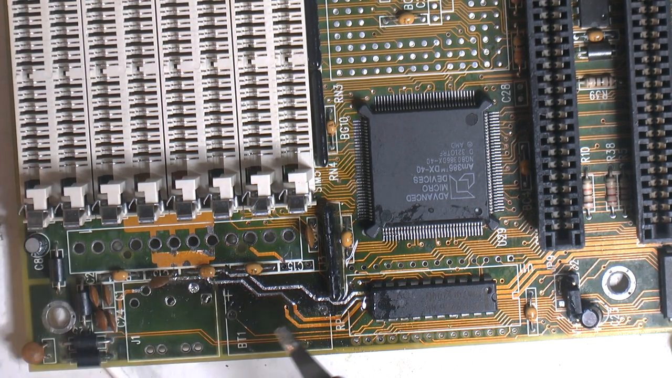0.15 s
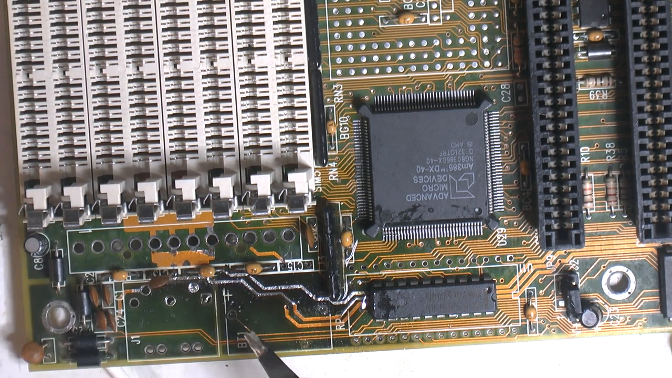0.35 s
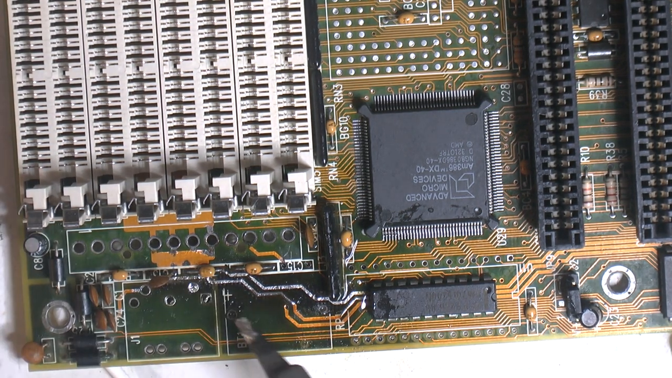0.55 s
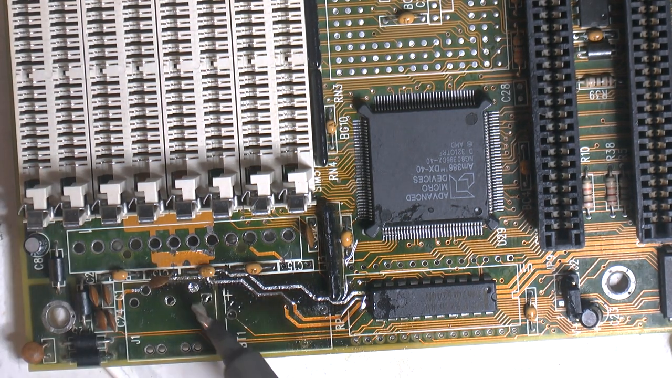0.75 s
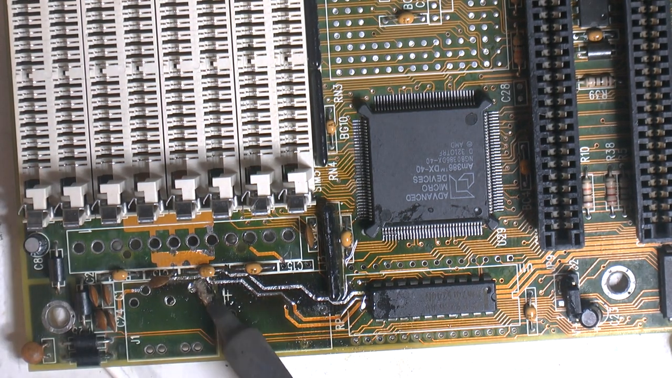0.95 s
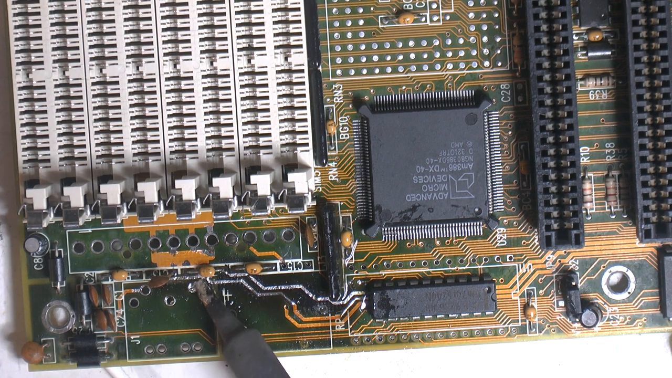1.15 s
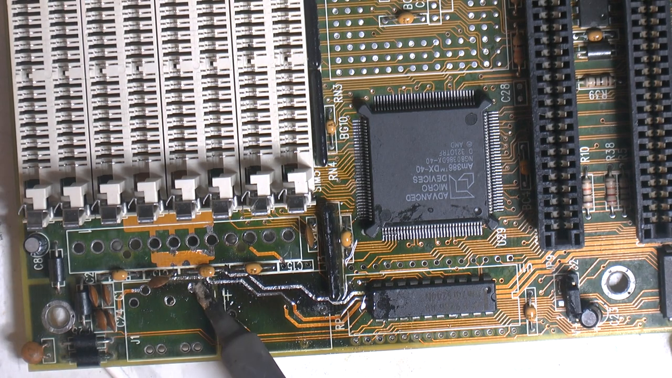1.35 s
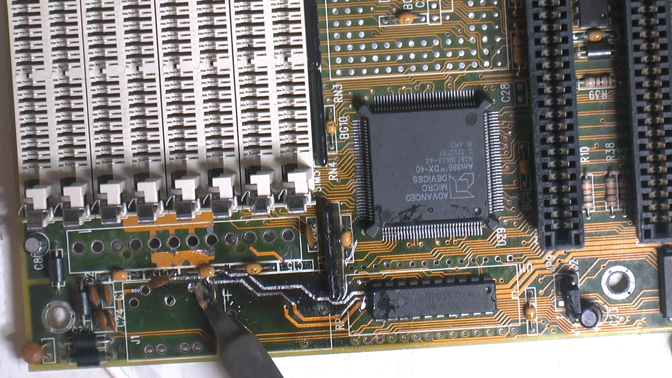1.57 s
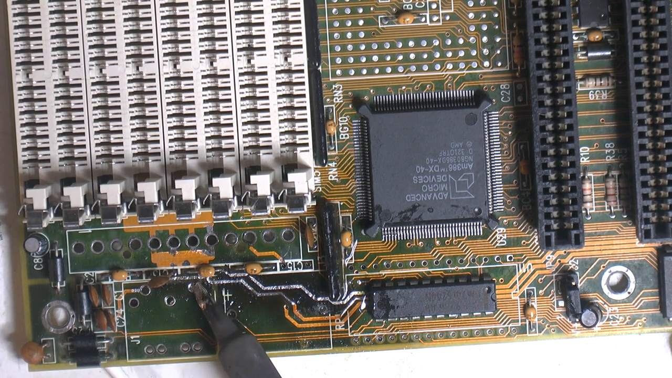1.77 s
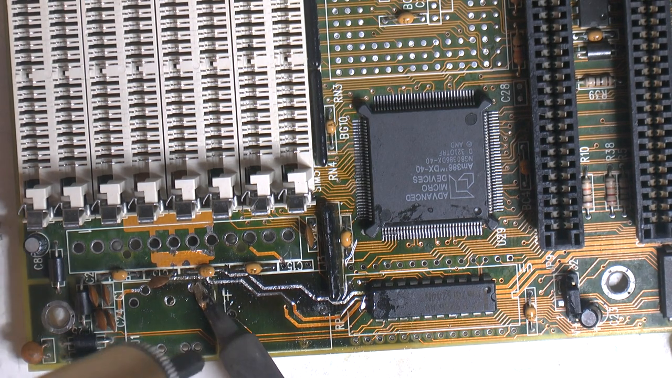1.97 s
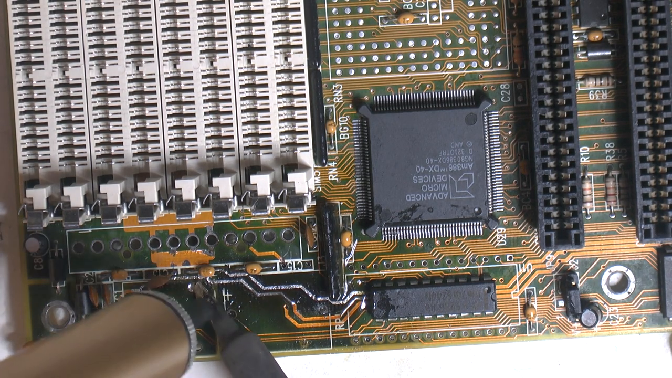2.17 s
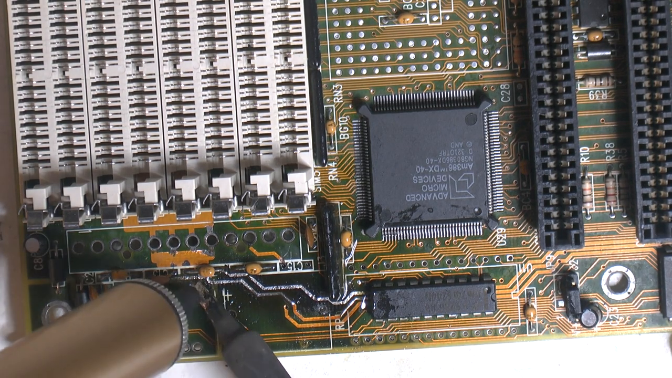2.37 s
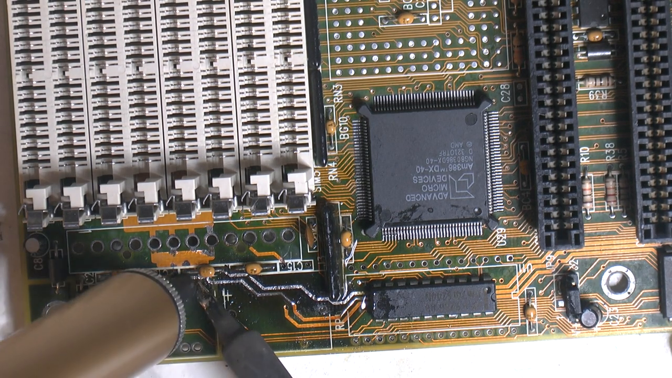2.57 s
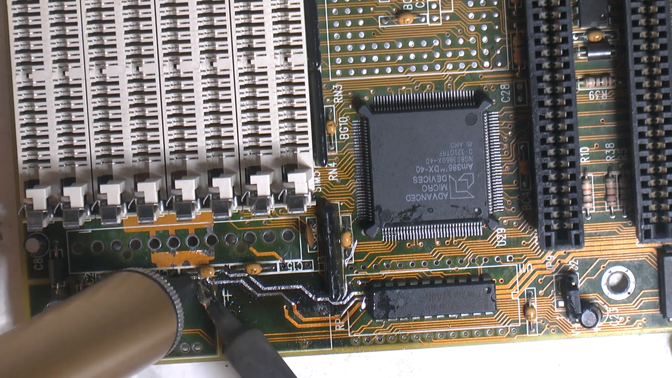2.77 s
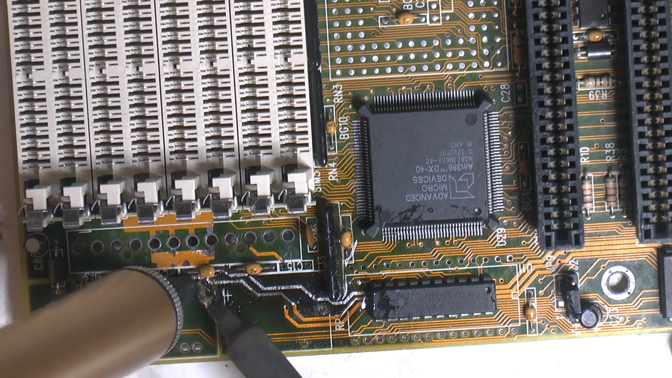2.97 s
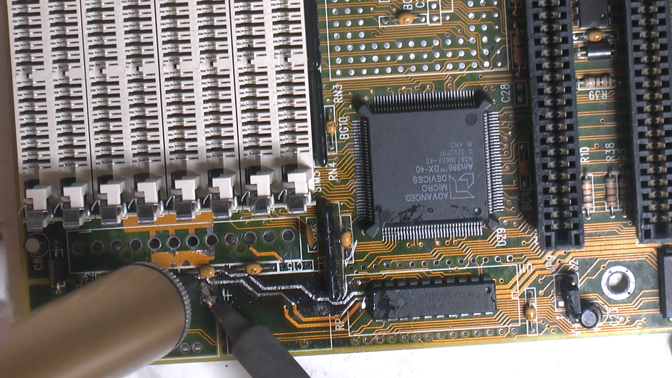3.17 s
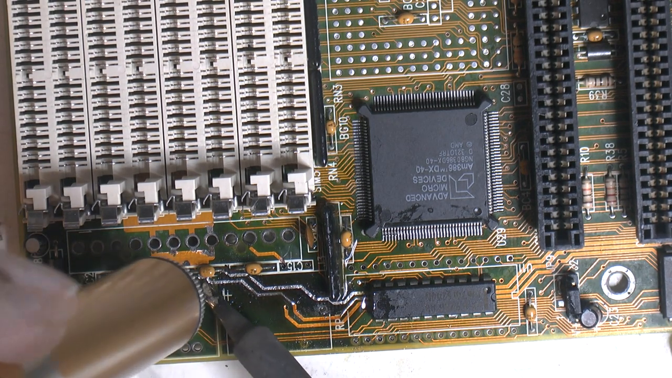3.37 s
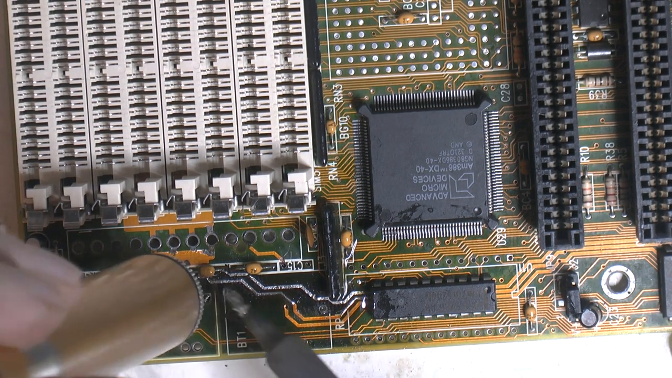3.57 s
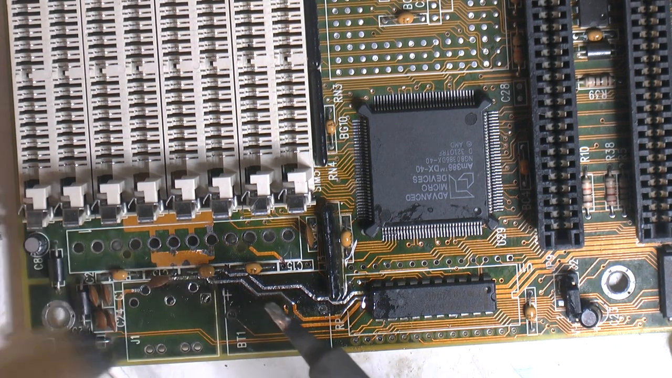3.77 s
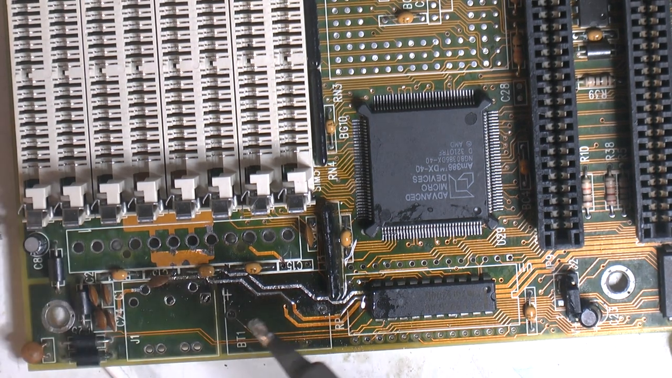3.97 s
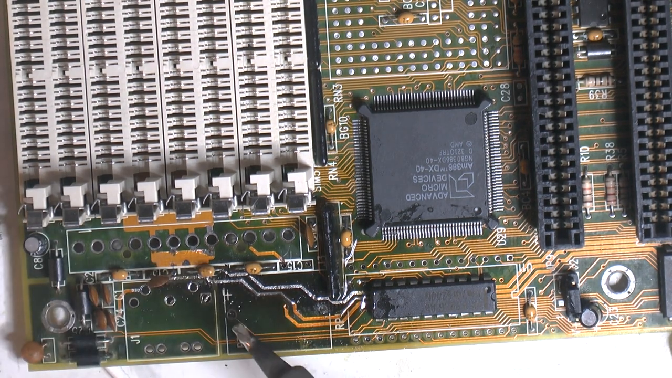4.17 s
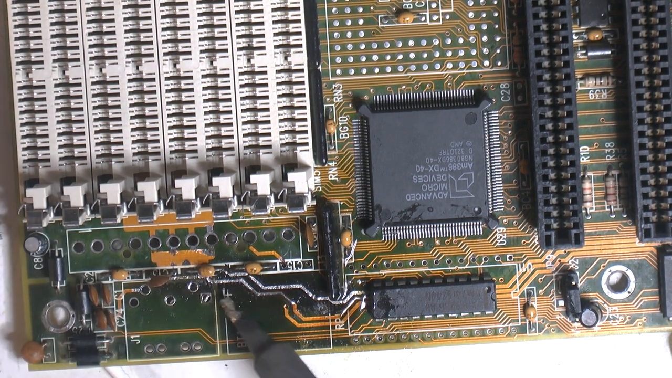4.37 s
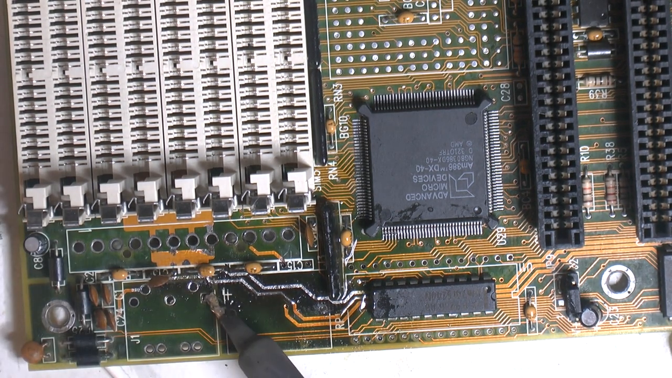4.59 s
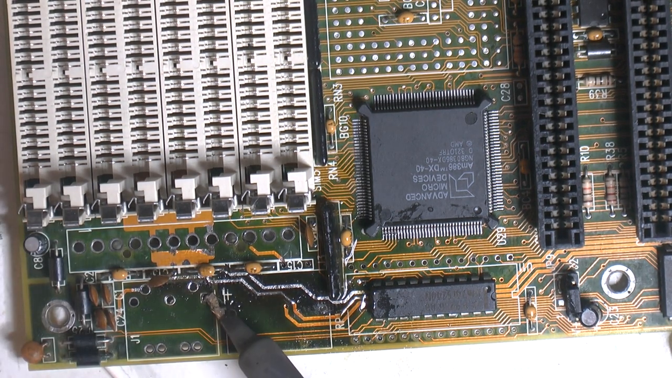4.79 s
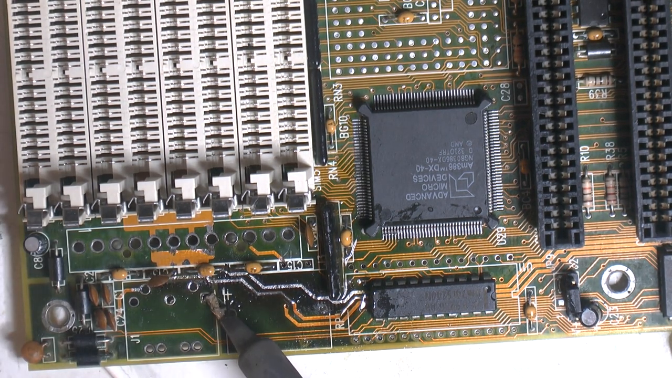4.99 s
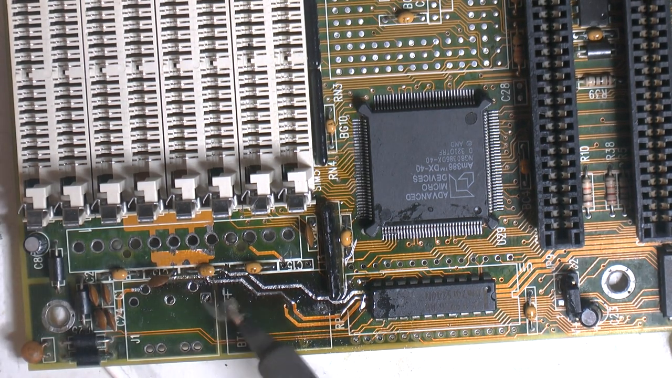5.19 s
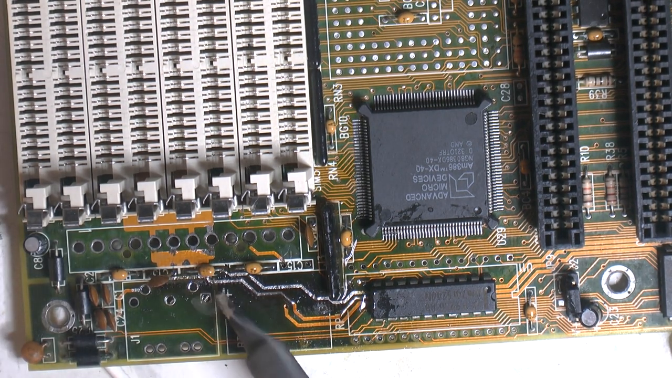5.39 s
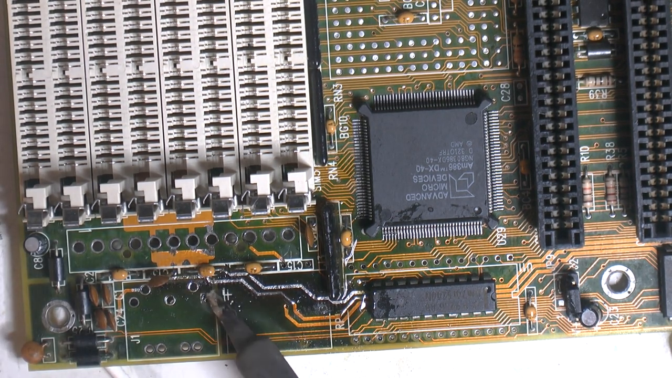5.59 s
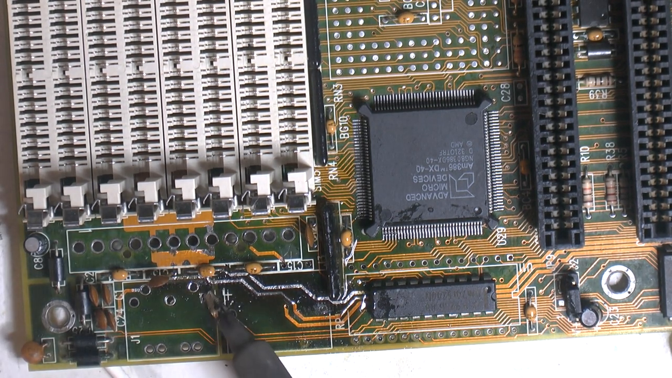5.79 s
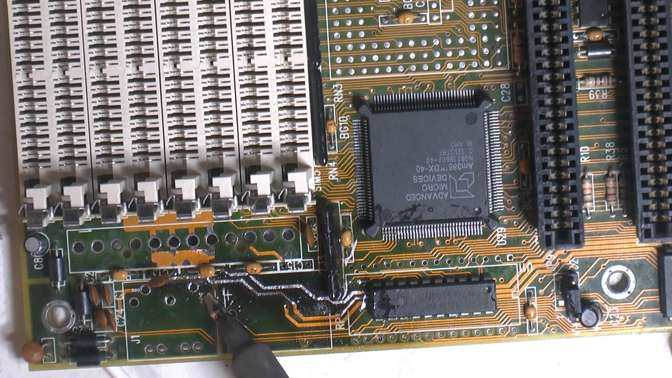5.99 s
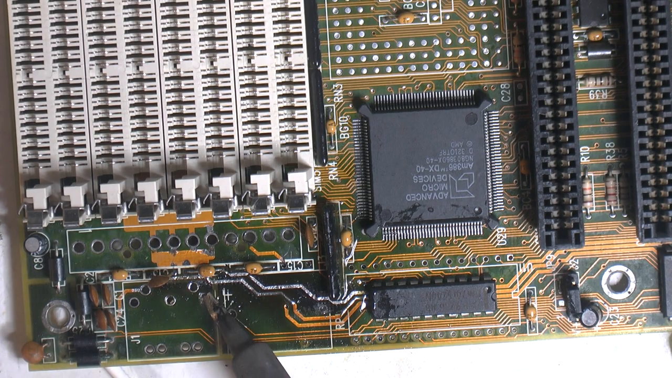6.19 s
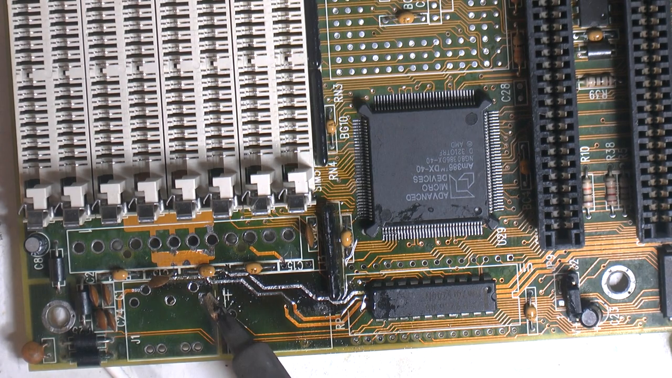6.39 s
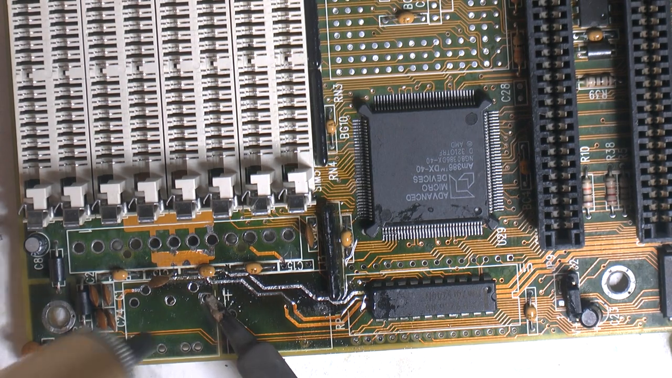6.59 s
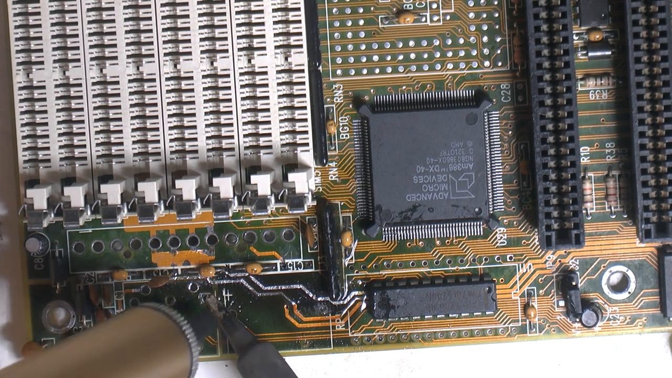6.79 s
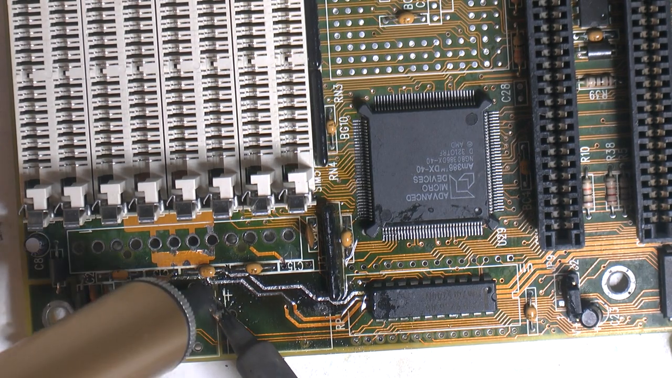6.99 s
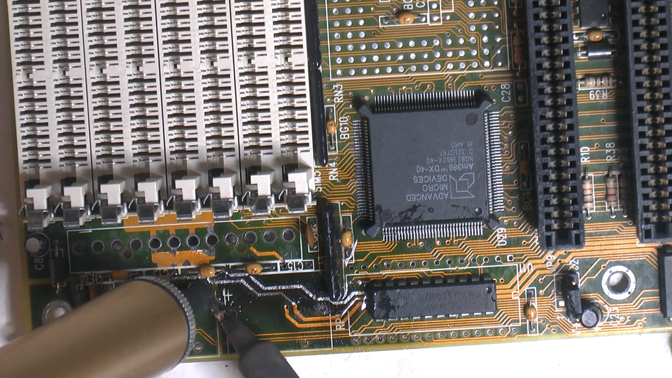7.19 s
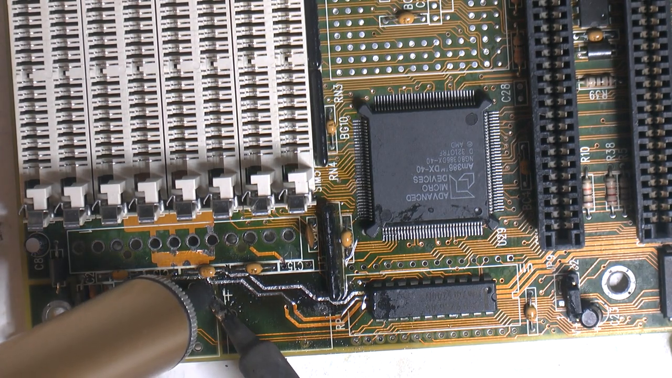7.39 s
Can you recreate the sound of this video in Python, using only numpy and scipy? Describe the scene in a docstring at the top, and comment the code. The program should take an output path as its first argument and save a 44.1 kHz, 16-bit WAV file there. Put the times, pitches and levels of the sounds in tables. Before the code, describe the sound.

A desoldering pump clicks as it is cocked, fires with one loud snap and thud, then is cocked again over a faint hum.

```python
"""A spring-loaded desoldering pump, worked close by over a circuit board on a bench. Its plunger slides in
with friction and latches; on release the piston flies back, drawing air, and its impact on the stop
overloads the input. Iron and pump bump the board and the bench, whose damped modes thud, ring and rock;
heavy jolts leave a low drone. A small room reverberates over a faint hum."""
import sys
import numpy as np
from scipy import signal
from scipy.fft import rfft, irfft
from scipy.io import wavfile
from scipy.ndimage import uniform_filter1d

SR = 44100
rng = np.random.default_rng(int(sys.argv[2]) if len(sys.argv) > 2 else 0)


def dump(signal):
    """Clip the signal to [-1, 1] and save it as 16-bit WAV at the path in sys.argv[1]."""
    limited = np.clip(np.atleast_2d(signal).T, -1, 1)
    pcm = np.round(limited * 32767).astype(np.int16)
    wavfile.write(sys.argv[1], SR, pcm)


N = 328545
TIME = np.arange(N) / SR
RING_TIME = TIME[:SR]
FREQS = np.maximum(np.arange(2049) * SR / 4096, 1)


def undb(db):
    """Amplitude ratio of a level in decibels."""
    return 10 ** (np.asarray(db) / 20)

def unit(x):
    """Normalisation to rms 1."""
    return x / np.sqrt(np.mean(x ** 2))

def strength(x):
    """Normalisation of a blow: its loudest two milliseconds peak near 1."""
    return x / (2 * np.sqrt(uniform_filter1d(x ** 2, size=88).max()))

def at_hz(points, hz):
    """Interpolation of (f, value) points on a logarithmic frequency axis."""
    f, value = np.transpose(points)
    return np.interp(np.log(hz), np.log(f), value)

def colour(x, db):
    """Minimum-phase filter with gain db at FREQS, from the folded cepstrum."""
    cepstrum = irfft(db * np.log(10) / 20)
    half = len(cepstrum) // 2
    cepstrum[1:half] *= 2
    cepstrum[half + 1:] = 0
    return signal.fftconvolve(x, irfft(np.exp(rfft(cepstrum))))[:len(x)]

def noise(spectrum):
    """Filtered Gaussian noise of rms 1."""
    return unit(colour(rng.standard_normal(N), at_hz(spectrum, FREQS)))

def walk(rate):
    """Smooth random modulation of rms 1, with `rate` new values a second."""
    step = max(int(SR / rate), 1)
    stairs = np.repeat(rng.standard_normal(N // step + 1), step)
    return unit(uniform_filter1d(stairs, step)[:N])

def tone(hz, waver_hz=1.0, waver_db=2.5):
    """Sinusoid of rms near 1, randomly modulated in frequency and amplitude."""
    phase = 2 * np.pi * np.cumsum(hz + waver_hz * walk(5.6)) / SR
    return np.sqrt(2) * np.sin(phase) * undb(waver_db * walk(5.7))

def fade(t60):
    """Exponential decay, 60 dB down after t60."""
    return np.exp(-np.log(1000) * RING_TIME / t60)

def burst(t60):
    """Decaying noise: a dying shower of micro-impacts."""
    return rng.standard_normal(SR) * fade(t60)

def held(start, end, attack_s, release_s):
    """Envelope with a quadratic rise from start and an exponential decay from end."""
    rise = np.clip((TIME - start) / attack_s, 0, 1) ** 2
    return rise * np.exp(-np.maximum(TIME - end, 0) / release_s)

def add(track, s, sound):
    """Superposition of a sound on the track at time s."""
    start = max(int(s * SR), 0)
    track[start:start + len(sound)] += sound[:N - start]


# lines of the workshop's hum: f/Hz, rms level/dB
HUM_LINES = [(59.2, -62.5), (100.3, -54), (192, -65.5), (340, -67), (901, -77.5), (1319, -83.5)]
# spectra of the rumble under the bench and of the even noise: f/Hz, level/dB
RUMBLE_SPECTRUM = [(12, -14.5), (26, -1.5), (45, -7), (62, -11.5), (80, -18.5), (100, -21), (200, -22),
                   (400, -39.5), (2000, -78.5)]
AIR_SPECTRUM = [(20, -2.5), (33, -7.5), (65, -16), (82, -19), (103, -2.5), (145, -17), (165, -22.5),
                (195, -12.5), (250, -24.5), (340, -20.5), (440, -27), (900, -32.5), (1600, -35.5),
                (2500, -39.5), (3000, -36), (3600, -42), (15500, -48.5)]

def workshop(rumble_db=-51, swell_db=4, air_db=-52):
    """Noise floor: a line spectrum of hum over continuous spectra of swelling rumble and even hiss."""
    hum = sum(undb(db) * tone(hz) for hz, db in HUM_LINES)
    rumble = undb(rumble_db + swell_db * walk(2.7)) * noise(RUMBLE_SPECTRUM)
    return hum + rumble + undb(air_db) * noise(AIR_SPECTRUM)


# frequency response of the room: f/Hz, level/dB
ROOM_RESPONSE = [(60, -16.5), (200, -21.5), (450, -13.5), (900, -4.5), (1400, -3), (1900, -7), (2700, -9),
                 (4000, -9), (7000, -8), (11000, -7), (16000, -13)]
# reverberation time: f/Hz, T60/s
REVERB_TIMES = [(100, 0.4), (500, 0.46), (2000, 0.48), (6000, .52), (10000, 0.29), (16000, .3)]

def room(x, build_s=0.0063, wall_s=0.023, wall_width_s=0.0025, wall_db=3):
    """Reverberation: a diffuse field decays by octave band, with early reflections from near walls."""
    spectrum = rfft(rng.standard_normal(SR))
    octave = np.log2(np.clip(np.arange(len(spectrum)), 125, 16000))
    tail = np.zeros(SR)
    for hz in 125 * 2 ** np.arange(8):
        band = irfft(spectrum * np.maximum(1 - np.abs(octave - np.log2(hz)), 0), SR)
        tail += band * fade(at_hz(REVERB_TIMES, hz))
    build_up = 1 - np.exp(-(RING_TIME / build_s) ** 2)
    reflections = undb(wall_db * np.exp(-((RING_TIME - wall_s) / wall_width_s) ** 2))
    tail *= build_up * reflections
    tail = colour(tail / np.sqrt(np.sum(tail ** 2)), at_hz(ROOM_RESPONSE, FREQS))
    return signal.fftconvolve(x, tail)[:N]


# heavy jolts of the bench: t/s, level/dB
BENCH_JOLTS = [(0, -40), (3.6, -36.5), (4.719, -46)]
# its lightly damped modes: f/Hz, relative level/dB, T60/s
SLOW_MODES = [(32, 5.5, 2.6), (60.7, -10, 8), (130.6, -10, 9), (137.5, -2, 1.8), (183, -16.5, 1.8),
              (214.56, -15, 1.4)]

def bench_drone(attack_s=0.0069):
    """Free vibration: after a jolt, low modes with little damping sound on for seconds."""
    out = np.zeros(N)
    for s, jolt_db in BENCH_JOLTS:
        for hz, db, t60 in SLOW_MODES:
            out += undb(jolt_db + db) * held(s, s, attack_s, t60 / np.log(1000)) * tone(hz)
    return out


def bending_wave(hz, sweep=0.5794, peak_cycles=1.4, fall=0.89):
    """Flexure of the struck bench: the first swing swells over a cycle or so as its pitch sags to hz."""
    cycles = hz * RING_TIME
    age = cycles / peak_cycles
    phase = 2 * np.pi * (cycles + sweep * (1 - np.exp(-cycles)))
    return np.sin(phase) * age ** 2 * np.exp(fall * (1 - age ** 2))

def modes(table, weight_db, swell_cycles):
    """Modal superposition: damped sinusoids build up, slightly detuned at every blow; peak 1."""
    hz, db, t60 = np.transpose(table)[:, :, None]
    cycles = hz * (1 + 0.02 * rng.standard_normal(hz.shape)) * RING_TIME
    swell = 1 - np.exp(-(cycles / swell_cycles) ** 2)
    ring = np.sum(undb(db + weight_db) * swell * fade(t60) * np.sin(2 * np.pi * cycles), axis=0)
    return ring / np.abs(ring).max()

# modes of the board and of the bench top: f/Hz, level/dB, T60/s
BOARD_MODES = [(348, 1.5, 0.05), (426.7, -5, 0.076), (497, 7, 0.032), (620, -5, .023), (850, -16, 0.042)]
BENCH_MODES = [(72, -12.5, 0.15), (110.5, 3.5, 0.17), (137.5, -7, .11), (149.5, 0.5, 0.096),
               (188, -6, 0.14), (218, 1.5, 0.16), (259, -5.5, .08), (307.6, -17.5, 0.034),
               (402, -9.5, 0.12)]
# spectrum of the board's dry clatter: f/Hz, level/dB
CLATTER_SPECTRUM = [(150, -19.5), (400, -4), (620, 3.5), (800, 3.5), (1100, -9), (1480, -8), (1950, -14),
                    (2600, -20), (6000, -40.5), (16000, -63.5)]
# blows: t/s, thud level/dB, thud f/Hz, then tock, clatter and ring level/dB relative to the thud
BLOWS = [(.995, -21.5, 124, -10.5, -3, 0), (1.321, -44, 155.6, -12, -7.5, 5),
         (1.721, -49.5, 187, -23, -2.5, -2), (2.611, -20.5, 120.3, -20, -30, -4.5),
         (2.646, -28, 187, -28, -21, 2.5), (3.134, -41, 162, -26.5, -14, 4),
         (3.5028, 8.5, 102.5, -22, -25.5, -3), (3.5391, 1, 188.5, -6.5, -11, -10.5),
         (3.553, 2.5, 174, -13, -35.5, -13), (4.419, -23, 208, -3, -17, -2.5),
         (4.54, -20, 153.6, -10.5, -32, -3.5), (4.558, -24, 160, -14, 0.5, -8),
         (4.6117, -3, 152.3, -6, -11.5, -5), (4.678, -3, 151, -5, -11, -4.5), (4.72, -3, 189, -2, -6.5, -4),
         (5.183, -38.5, 144.4, -8.5, -6.5, 1.5), (5.556, -27.5, 117, -5, -3, 4.5),
         (5.714, -44, 217, -15.5, -19, 10.5), (5.938, -33, 166, -9.5, -3.5, 0),
         (6.073, -38, 172, -26.5, -29.5, 2), (6.644, -31, 183, -15.5, -14, 2),
         (7.02, -29, 116.5, -38, -34, -7), (7.096, -28, 116.8, -40, -36, -5.5)]

def bumps(focus_db=7.5, clatter_t60=0.064, rock_hz=27, rock_t60=0.73, rock_db=-27.5, rock_yield=0.65):
    """Impact excitation: the board tocks and clatters; the bench thuds, rings and rocks slowly."""
    out = np.zeros(N)
    rock = np.sin(2 * np.pi * rock_hz * RING_TIME) * (fade(rock_t60) - fade(.06))
    for s, db, thud_hz, tock_db, clatter_db, ring_db in BLOWS:
        tock = modes(BOARD_MODES, 0, swell_cycles=1.2)
        clatter = strength(colour(burst(clatter_t60), at_hz(CLATTER_SPECTRUM, FREQS)))
        # the place of the blow favours the modes near the thud's pitch
        octaves_off = np.log2(np.array(BENCH_MODES)[:, :1] / thud_hz)
        ring = modes(BENCH_MODES, -focus_db * octaves_off ** 2, swell_cycles=3.9)
        rock_gain = undb(rock_db - rock_yield * db)  # rocking grows more slowly than the blow
        board = undb(tock_db) * tock + undb(clatter_db) * clatter
        bench = bending_wave(thud_hz) + undb(ring_db) * ring + rock_gain * rock
        add(out, s, undb(db) * (board + bench))
    return out


# spectrum of the wiping tip: f/Hz, level/dB
WIPE_SPECTRUM = [(1000, -7), (2500, -6), (3800, -1.5), (7000, -4), (8500, -6.5), (10000, -16), (16000, -24)]

def tip_wipe(db=-56.5):
    """Friction noise: the iron's tip wipes across the board and lifts off."""
    return undb(db) * held(0, .055, attack_s=0.00089, release_s=0.038) * noise(WIPE_SPECTRUM)


def resonance(hz, width):
    """Power response of a second-order resonator at FREQS."""
    return 1 / (1 + ((FREQS ** 2 - hz ** 2) / (FREQS * width)) ** 2)

# resonances of the pump barrel: f/Hz, bandwidth/Hz, level/dB
BARREL_RESONANCES = [(890, 450, -7.5), (2328, 290, 0), (2940, 350, -1), (3720, 340, -6.5),
                     (4668, 370, -3.5), (5600, 160, -10.5), (6074, 240, -1.5), (6860, 570, -2.5),
                     (7570, 380, -4), (8300, 700, -4), (8600, 190, -8.5), (10200, 520, -10.5),
                     (11550, 350, -8), (14380, 1200, -13.5)]

def click(t60, tilt_db, lowest_hz, bright_hz, lift_db, valley_db=-15, lift_width=0.13, grain_db=3):
    """Source and filter: a hard contact chatters through the barrel's resonances."""
    barrel_power = sum(undb(db) ** 2 * resonance(hz, width) for hz, width, db in BARREL_RESONANCES)
    shape_db = 10 * np.log10(undb(valley_db) ** 2 + barrel_power)
    shape_db -= 10 * np.log10(1 + (lowest_hz / FREQS) ** 6)  # small parts radiate no bass
    shape_db += tilt_db * np.log2(FREQS / 4000)
    shape_db += lift_db * resonance(bright_hz, lift_width * bright_hz)
    # the parts touch and part several times a millisecond
    chatter = burst(t60) * undb(grain_db * np.repeat(rng.standard_normal(SR), 20)[:SR])
    return strength(colour(chatter, np.maximum(shape_db, -70)))


# ticks and scratches on the board: t/s, peak level/dB, T60/s, emphasised f/Hz
BOARD_TICKS = [(.076, -56, .02, 14000), (0.9947, -31.5, 0.021, 1860), (1.7221, -53.5, .03, 4500),
               (2.643, -44.5, 0.028, 7840), (3.129, -51, .02, 7230), (3.179, -53.5, 0.11, 9050),
               (3.48, -44, .025, 4770), (4.176, -45, 0.031, 4870), (5.3987, -52, .12, 7760),
               (5.5574, -48, .025, 6040), (5.9365, -49.5, 0.055, 6410), (6.077, -53, .04, 8920)]

def ticks():
    """Contact transients: the iron's tip and the nozzle touch the board lightly."""
    out = np.zeros(N)
    for s, db, t60, hz in BOARD_TICKS:
        add(out, s, undb(db) * click(t60, tilt_db=-2, lowest_hz=.55 * hz, bright_hz=hz, lift_db=7.5))
    return out


# spectrum of the seal's hiss in the barrel: f/Hz, level/dB
SEAL_SPECTRUM = [(200, -12), (900, -7.5), (1700, -6.5), (2400, -4.5), (3200, 0.5), (4000, -1), (5200, -7.5),
                 (7000, -4), (9500, -8), (12000, -7), (16000, -12)]
# pushes of the plunger: start t/s, end t/s, attack/s, level/dB, first and last scrape f/Hz
PLUNGER_PUSHES = [(0.431, .49, 0.0099, -63, 3000, 2980), (.485, .618, 0.042, -47.5, 3068, 2250),
                  (4.41, 4.557, .012, -47.5, 3850, 4290)]

def plunger_slide(grain_db=-0.5, grip_db=3, scrape_db=-3, spread_hz=170):
    """Stick-slip friction: the seal rubs in small slips and excites one gliding resonance."""
    slips = undb(grain_db * walk(700) + grip_db * walk(50))
    hiss = noise(SEAL_SPECTRUM)
    out = np.zeros(N)
    for start, end, attack_s, db, first_hz, last_hz in PLUNGER_PUSHES:
        hz = np.interp(TIME, [start, end], [first_hz, last_hz]) + spread_hz * walk(900)
        scrape = walk(300) * np.sin(2 * np.pi * np.cumsum(hz) / SR)
        push = undb(db) * held(start, end, attack_s, release_s=.01)
        out += push * slips * (hiss + undb(scrape_db) * scrape)
    return out


# spectrum of the judder: f/Hz, level/dB
JUDDER_SPECTRUM = [(60, -28), (140, -11.5), (230, 1), (320, 2), (520, -12), (800, -25), (2000, -38.5),
                   (8000, -67.5)]

def plunger_judder(start=4.41, end=4.79, start_db=-41.5, swell_db_per_s=48):
    """Structure-borne sound: the plunger's judder enters the bench, swelling as the hand bears down."""
    pressed_s = np.clip(TIME, start, end) - start
    swell = undb(start_db + swell_db_per_s * pressed_s)
    return swell * held(start, end, attack_s=.02, release_s=0.015) * noise(JUDDER_SPECTRUM)


# latch, trigger and plunger clicks: t/s, peak level/dB, tilt/(dB/octave), cutoff f/Hz, emphasised f/Hz
MECHANISM_CLICKS = [(.534, -36.5, -4, 1200, 3027), (.6201, -0.5, -1.5, 1000, 2201),
                    (.7648, -16.5, -3, 533, 2000), (3.4995, -23.5, -3, 400, 6600),
                    (3.752, -29.5, -1, 1800, 7906), (4.419, -37.5, -8.5, 3000, 3930),
                    (4.469, -44.5, -7.5, 2000, 4240), (4.5573, -1, -4.5, 2520, 6600),
                    (4.7175, -17.5, -4.5, 700, 1935)]
# rings of the spring and latch: t/s, f/Hz, peak level/dB, T60/s
SPRING_RINGS = [(3.5367, 5390, -24, .22), (4.419, 3854, -36.5, .12), (4.5577, 6450, -23, .1),
                (4.5566, 6660, -24, .18)]

def pump_mechanism(click_t60=0.026):
    """Impact and free decay: the pump's parts click; spring and latch ring as damped oscillators."""
    out = np.zeros(N)
    for s, db, tilt_db, lowest_hz, bright_hz in MECHANISM_CLICKS:
        add(out, s, undb(db) * click(click_t60, tilt_db, lowest_hz, bright_hz, lift_db=5.5))
    for s, hz, db, t60 in SPRING_RINGS:
        add(out, s, undb(db) * np.sin(2 * np.pi * hz * RING_TIME) * fade(t60))
    return out


# spectrum of the air in the nozzle: f/Hz, level/dB
NOZZLE_SPECTRUM = [(300, 7), (2000, -13), (4500, -7), (7000, -4.5), (8500, -4.5), (10000, 1), (11500, -5),
                   (16000, -9)]
# the piston breaks free, then hits its stop: t/s, peak level/dB, T60/s, spectrum (f/Hz, level/dB)
PISTON_CRACKS = [(3.506, 6.2, .02, [(500, -21.5), (2500, -19), (4500, -10.5), (7500, 1.5), (10500, -3.5),
                 (16000, -16)]), (3.5378, 4.7, 0.027, [(250, -6.5), (700, 4.5), (950, 10.5), (1200, -4.5),
                 (1450, -3), (1950, 0), (2700, -2.5), (4200, -2), (6500, -3.5), (8500, -8), (11000, -10),
                 (16000, -11)])]

def piston(rush_db=-20):
    """Impulses and flow noise: two dry cracks, with air drawn in during the piston's flight between."""
    freed_s, stopped_s = PISTON_CRACKS[0][0], PISTON_CRACKS[1][0]
    flight = held(freed_s, stopped_s, attack_s=.002, release_s=0.0028)
    out = undb(rush_db) * flight * noise(NOZZLE_SPECTRUM)
    for s, db, t60, spectrum in PISTON_CRACKS:
        add(out, s, undb(db) * strength(colour(burst(t60), at_hz(spectrum, FREQS))))
    return out


def scene():
    """Superposition of the direct sound, its reverberation, the drone and the noise floor, in mono."""
    direct = tip_wipe() + pump_mechanism() + ticks() + piston()
    direct += bumps() + plunger_slide() + plunger_judder()
    return (direct + room(direct) + bench_drone() + workshop())[None]

def record(dry):
    """Overload: the input clips at full scale, then a low-pass filter cuts the top."""
    low_pass = signal.ellip(8, .2, 70, 15750, fs=SR, output="sos")
    return signal.sosfilt(low_pass, np.clip(dry, -1, 1))


dry = scene()
out = record(dry)
dump(out)
```